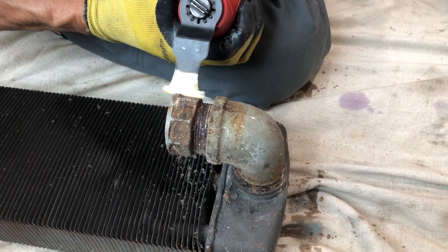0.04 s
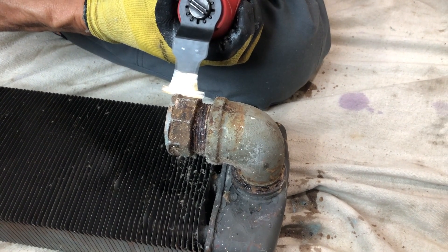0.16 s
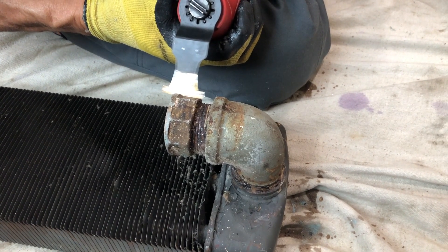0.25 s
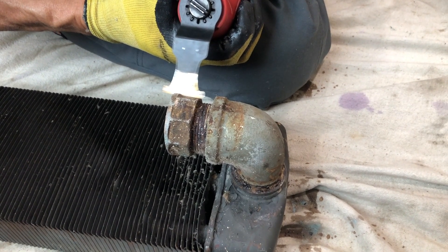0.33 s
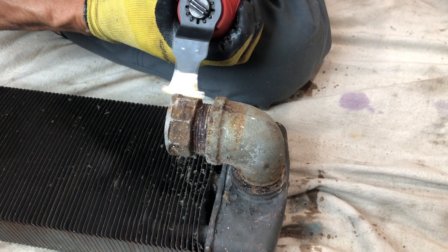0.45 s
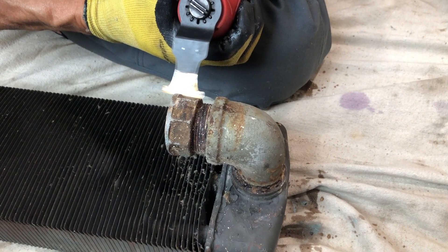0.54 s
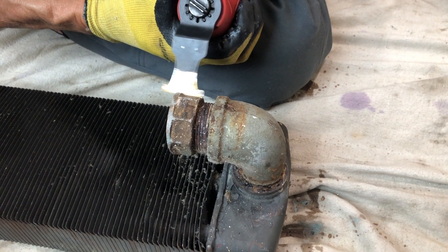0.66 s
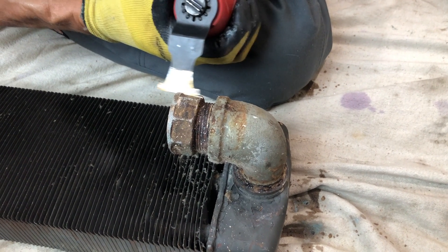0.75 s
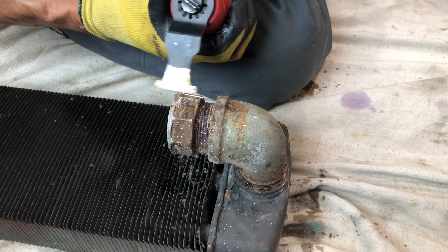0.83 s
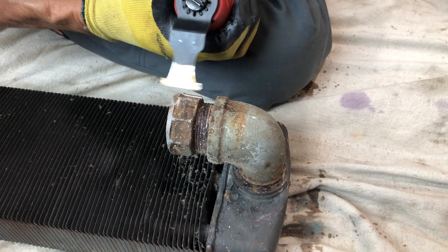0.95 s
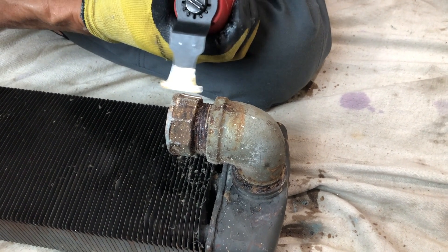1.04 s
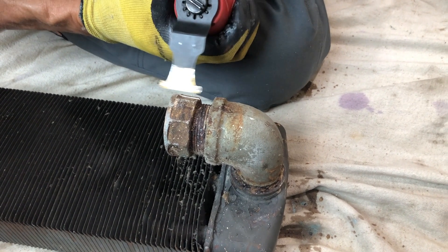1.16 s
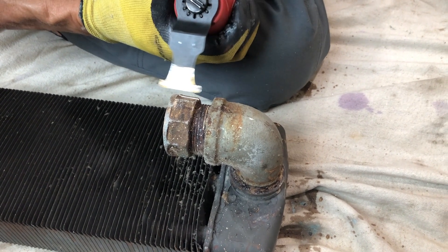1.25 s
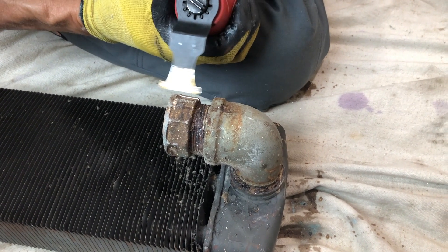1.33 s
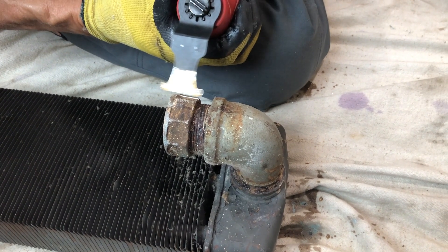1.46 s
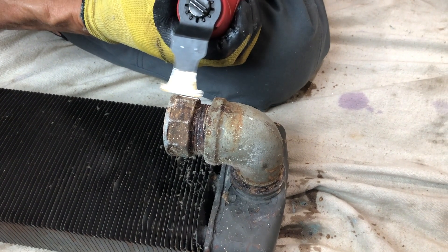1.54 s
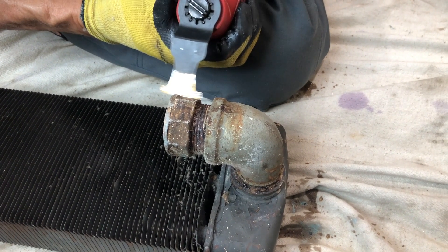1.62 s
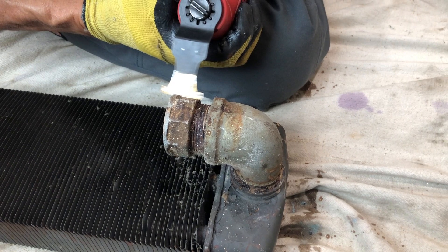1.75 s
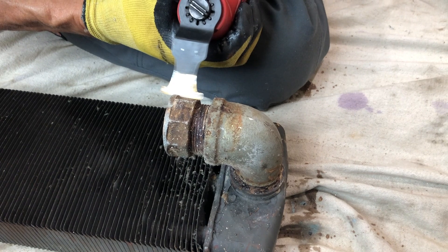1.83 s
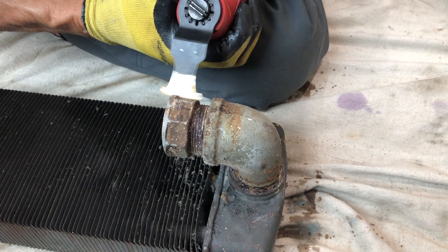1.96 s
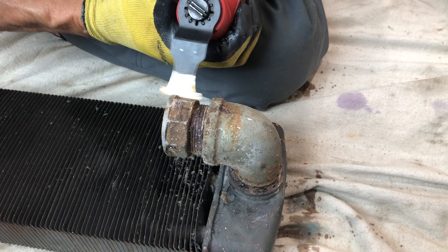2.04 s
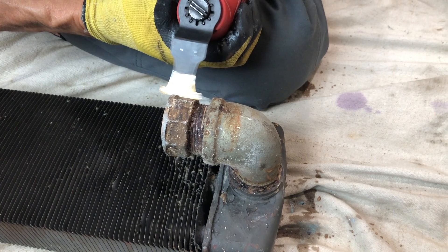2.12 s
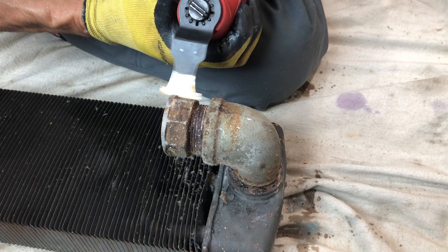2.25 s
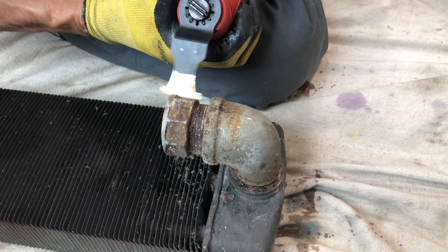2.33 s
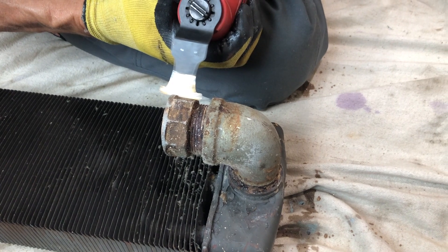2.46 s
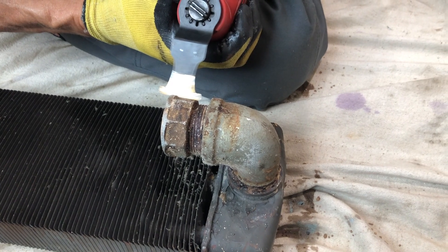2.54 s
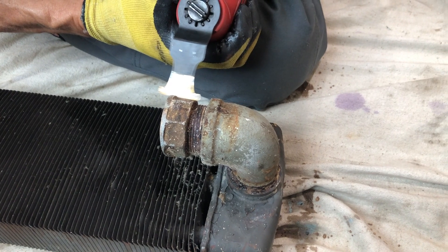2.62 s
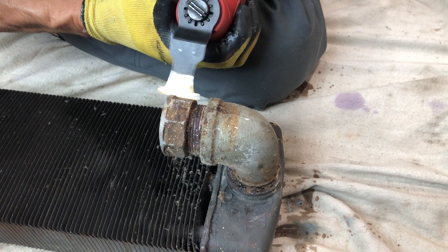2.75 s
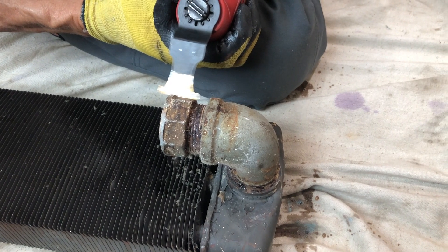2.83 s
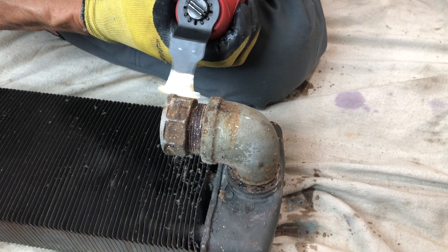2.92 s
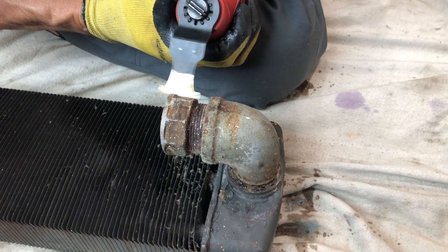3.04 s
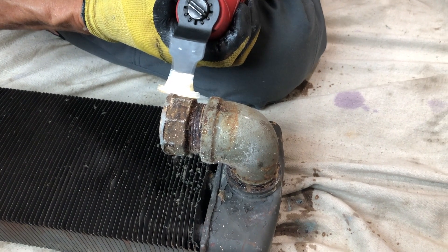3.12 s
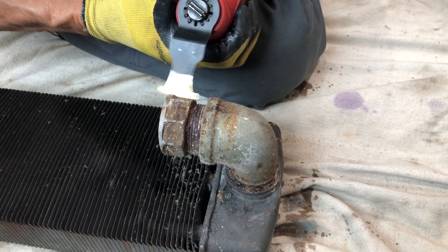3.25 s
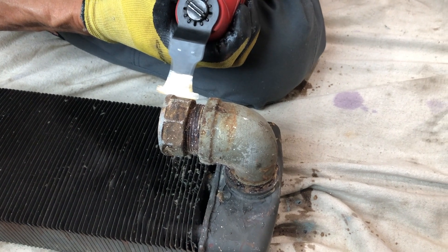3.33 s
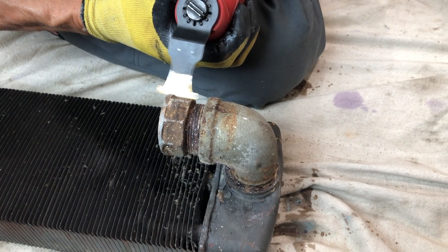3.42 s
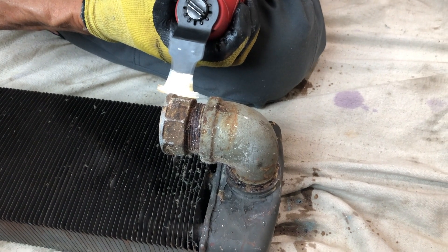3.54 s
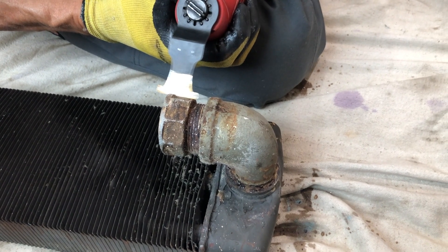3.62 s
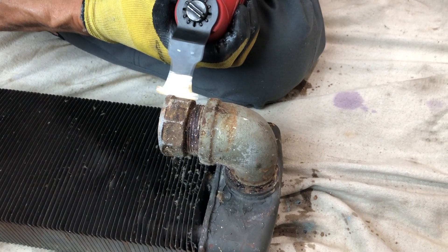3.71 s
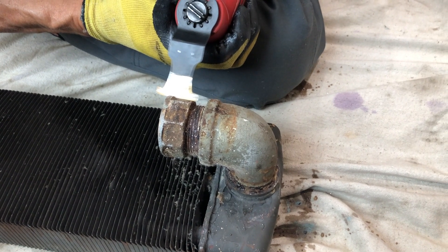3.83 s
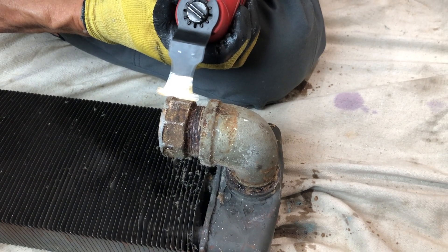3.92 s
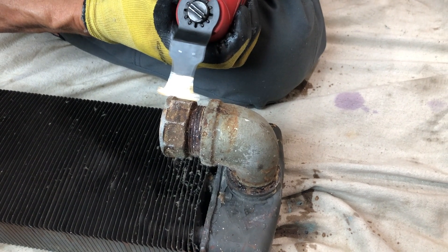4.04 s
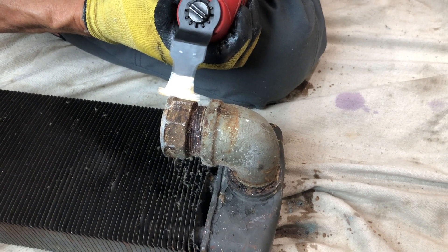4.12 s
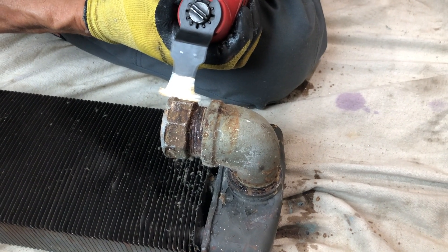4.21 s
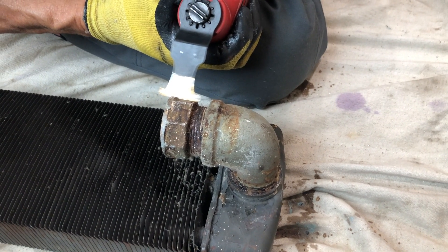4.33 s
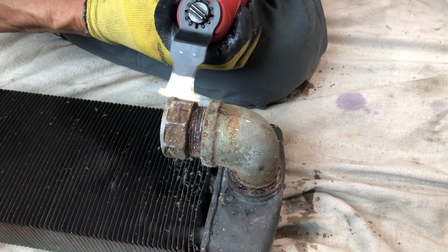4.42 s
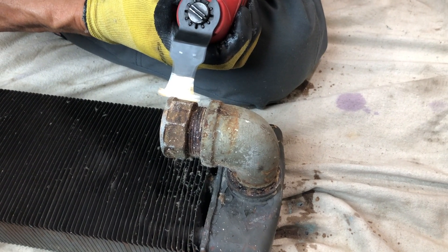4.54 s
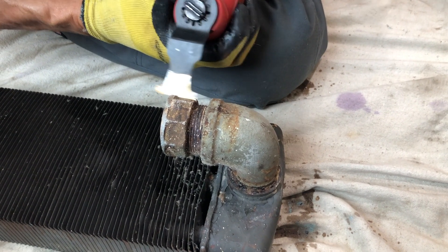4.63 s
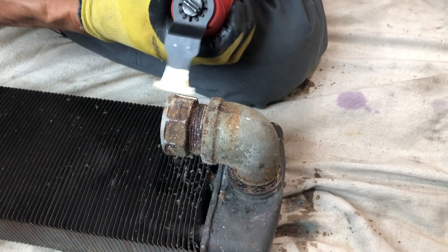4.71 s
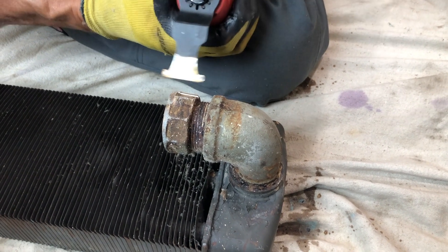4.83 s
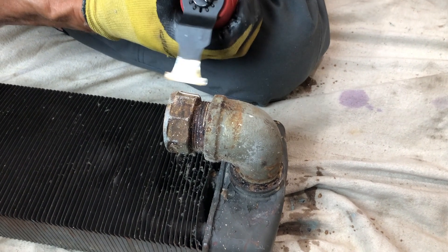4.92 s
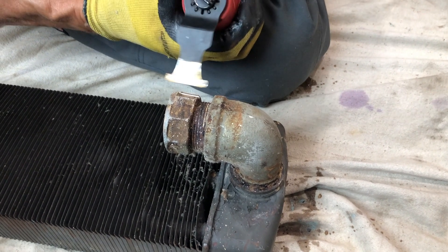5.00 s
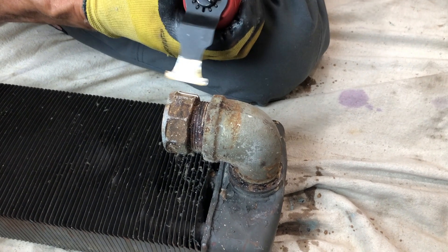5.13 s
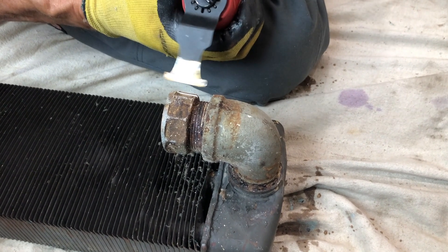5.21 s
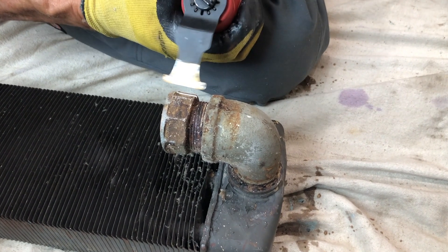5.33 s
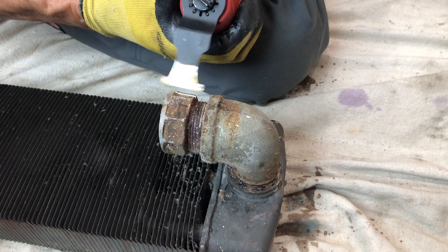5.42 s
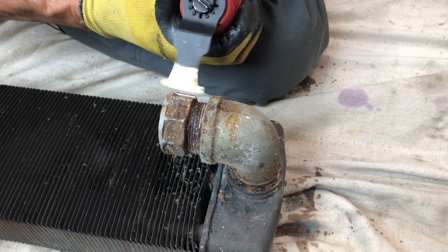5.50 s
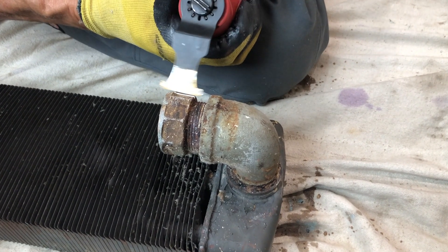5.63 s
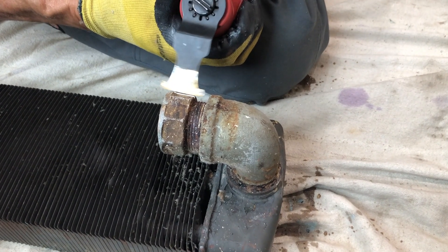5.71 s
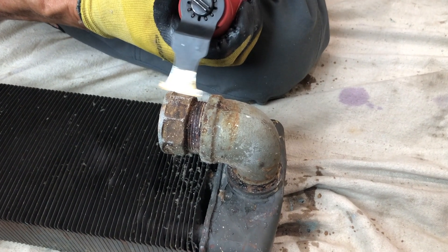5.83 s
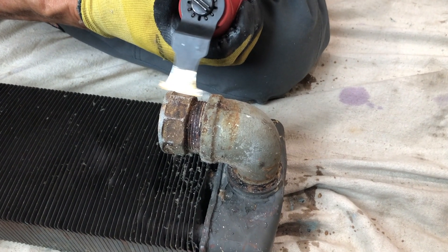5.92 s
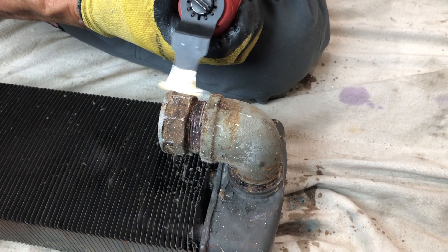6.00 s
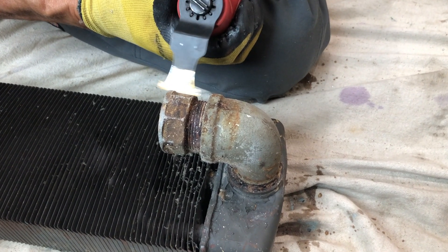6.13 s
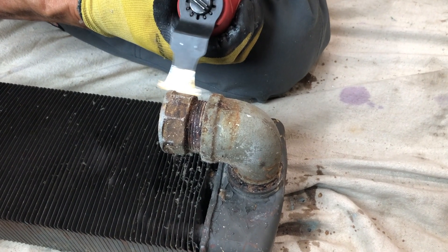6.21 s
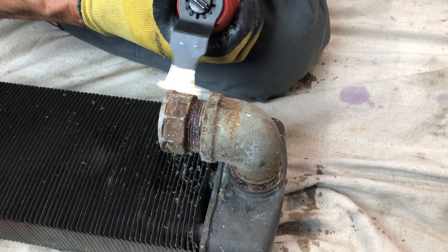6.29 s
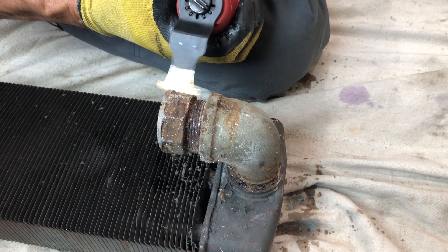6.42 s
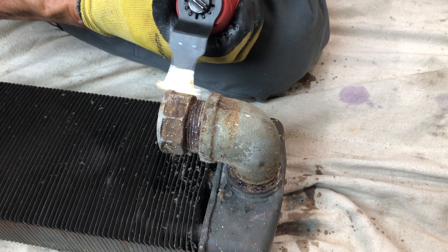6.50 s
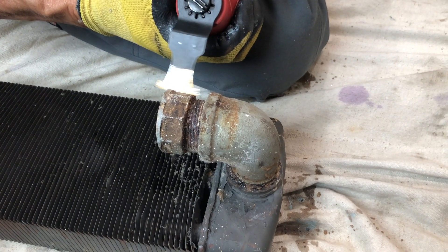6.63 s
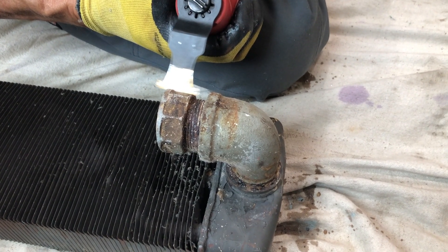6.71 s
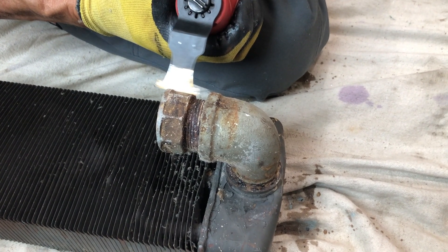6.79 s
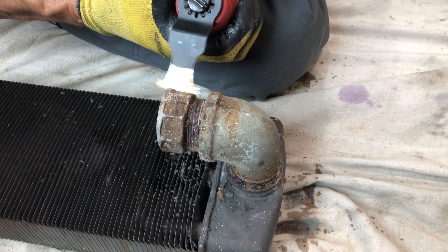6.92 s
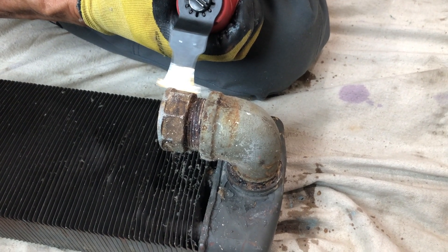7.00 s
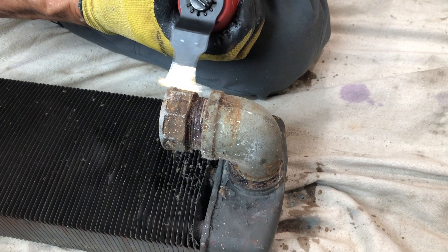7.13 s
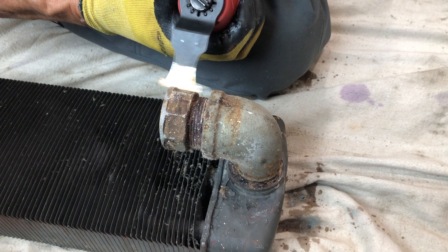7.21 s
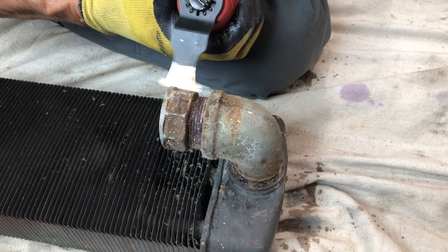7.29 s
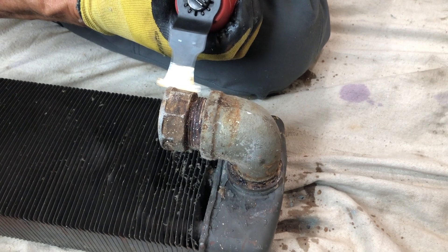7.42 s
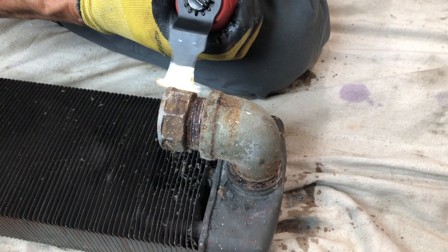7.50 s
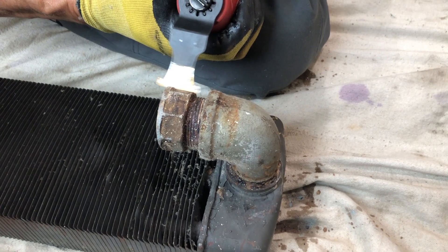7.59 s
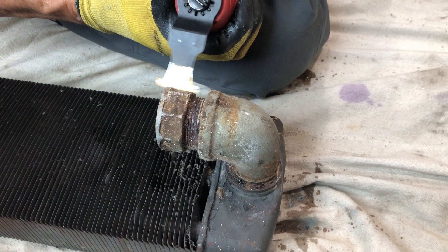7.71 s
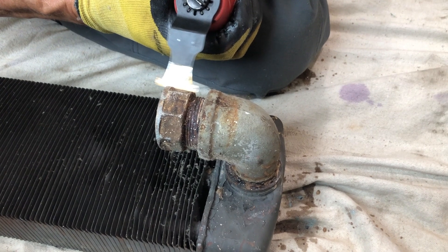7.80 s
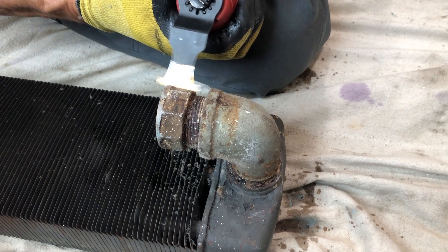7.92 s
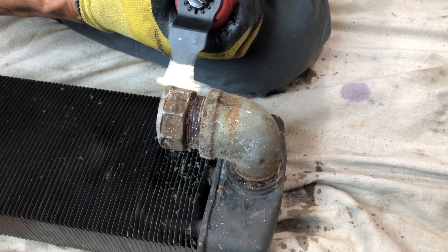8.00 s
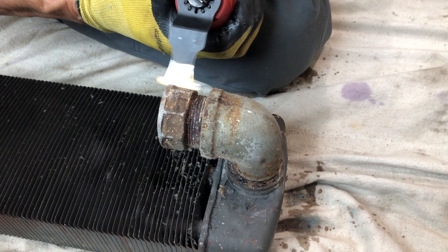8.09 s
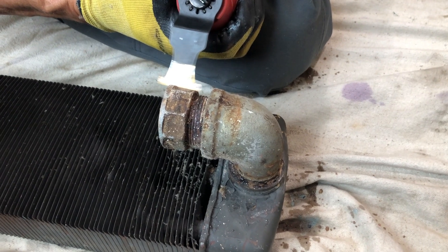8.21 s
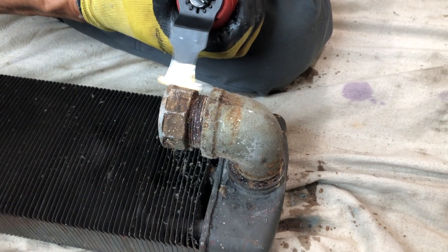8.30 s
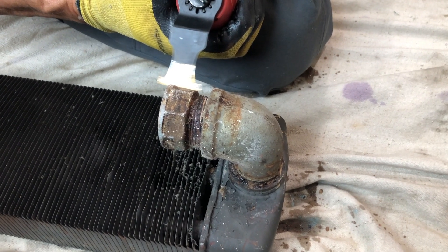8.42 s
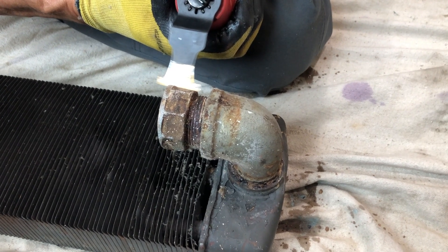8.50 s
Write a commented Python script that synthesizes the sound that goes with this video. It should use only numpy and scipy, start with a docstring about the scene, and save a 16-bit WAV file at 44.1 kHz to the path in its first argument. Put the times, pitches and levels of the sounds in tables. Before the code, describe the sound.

An oscillating power tool is already cutting a rusty steel pipe fitting at the start, close and dry in a quiet indoor space. The rasp is loud, bright and gritty, ringing through blade and pipe, with a fast steady buzz around 230 strokes per second. At about 0.65 s the blade lifts; light scratches fade into a much quieter motor buzz with fan hiss, its speed briefly rising. At 1.6 s it bites again and grinds until about 4.6 s, wavering with hand pressure, slipping and catching, while the loose work throbs and rattles. Two soft dull pops come close together near 3.75 s. From 4.7 to 5.6 s the tool runs free again, faintly buzzing. Brief touches lead into the last cut at 5.8 s, harsh and uneven with heavier jolts and low grinding, continuing to the end at about 8.6 s.

```python
"""Harsh steel rasping is heard first: an oscillating saw blade cuts a rusty fitting, lifts twice and returns.
Each stroke excites the resonances of blade and pipe with noise, and multiples of the swing rate add the blows.
The tool is a harmonic buzz over fan noise; the loose work throbs, grinds and rattles, and jolts kick it.
Two dull pops are swings of falling pitch, and a faint room rumble lies beneath."""
import sys
import numpy as np
from scipy import signal
from scipy.fft import rfft, irfft
from scipy.io import wavfile
from scipy.ndimage import uniform_filter1d

SR = 44100
rng = np.random.default_rng(int(sys.argv[2]) if len(sys.argv) > 2 else 0)


def unload_wav(signal):
    """Save mono or channel-first audio to the path in sys.argv[1] as 16-bit WAV at rate SR, clipped to [-1, 1]."""
    wavfile.write(
        sys.argv[1],
        SR,
        np.round(np.clip(np.atleast_2d(signal).T, -1, 1) * 32767).astype(np.int16),
    )


N = 377055

# Blade in the cut: full contact start_s, end_s
CUTS = [(-.1, 0.648), (1.632, 4.57), (5.79, 8.7)]
ENTER_S, LEAVE_S, LINGER_S = 0.017, 0.1, 0.2   # the throb outlasts the contact by LINGER_S
# Pressure of the hand: start_s, rasp_db, clang_db (re rasp)
FEED = [(0, -22.5, -11.5), (.14, -21.5, -10.5), (.33, -21, -7), (.45, -21.5, -9), (.64, -24.5, -8.5),
        (1.64, -23.5, -8.5), (1.72, -26, -7.5), (1.8, -19.5, -6.5), (1.9, -21, -11), (2.02, -22.5, -7),
        (2.2, -21, -8.5), (2.45, -22.5, -7.5), (2.9, -21.5, -11), (3.05, -24.5, -9.5), (3.21, -20.5, -8),
        (3.5, -23.5, -9.5), (3.85, -24.5, -9), (4.2, -23.5, -10), (4.55, -23.5, -9.5), (5.8, -25, -9.5),
        (5.97, -23, -11), (6.14, -22, -6), (6.4, -21.5, -8.5), (6.78, -21.5, -11.5), (7.05, -21.5, -9.5),
        (7.3, -23, -10), (7.45, -20.5, -10), (7.9, -21.5, -8), (8.24, -21, -10), (8.55, -24.5, -5.5)]
FEED_WAVER_DB, CLANG_WAVER_DB = 0.5, 1
# Teeth lose hold, then bite harder: start_s, rasp_loss_db (a negative loss reverses both)
SLIPS = [(.24, 1.5), (.385, 7), (.6, 3), (2.28, 6.5), (2.33, 4), (2.38, 2), (2.52, 4.5), (2.928, 7),
         (3.64, 1), (4.5, 2.5), (6.11, -1), (6.25, 3.5), (6.29, 3.5), (6.97, 3), (7.29, 3.5), (7.379, 0),
         (7.61, 4), (7.85, 1), (7.935, 4), (6.81, 2), (7.26, 1.5), (7.999, 6), (8.341, 6), (8.41, 3)]
SLIP_S, REBITE_S, REBITE_SHARE, CLANG_SLIP_SHARE = 0.025, 0.12, 0.17, 1.14
# Glancing touches near the work: start_s, length_s, rasp_db, clang_db
BRUSHES = [(0.683, 0.0072, -35, -39), (.71, 0.11, -41.5, -46), (.822, .012, -42, -42),
           (1.567, 0.057, -37.5, -37.5), (4.609, 0.029, -31, -38.5), (4.684, 0.0067, -38, -36),
           (4.716, 0.0085, -59, -53), (5.642, 0.028, -35, -35), (5.722, 0.032, -32, -35)]
BRUSH_RISE_S, BRUSH_FALL_S = 0.009, 0.011
# Seat of the blade in the kerf: start_s, favoured_pitch_hz (pipe), blows_db (re pipe rasp),
# whine_db (re low blade rasp), middle_modes_db
SEAT = [(0, 4100, 4, 2, -2), (.16, 3540, -8, -14, 2), (.3, 3260, -26, -7, -1.5), (.45, 3460, 4, -9, -1),
        (.62, 3880, -8, 0, 0), (1.65, 3600, -18, -21, 2), (1.92, 4080, 4, -4, 1), (2.15, 3770, -6, -15, -1),
        (2.6, 3400, -6, -21, -0.5), (2.85, 3320, 0.5, -4, -2), (3.05, 3370, -4.5, -8.5, -2.5),
        (3.3, 3500, -5, -19, 0.5), (3.55, 3330, 3, 3, -0.5), (3.8, 3340, -2.5, -9, -1.5),
        (4.05, 3370, 5, 8, -0.5), (4.22, 3300, -3, -12, -1), (4.55, 3500, 1.5, 5, -3),
        (5.75, 3700, -22, -36, -1.5), (5.95, 3750, 1, 0, 3), (6.14, 3400, -11, -22, -1),
        (6.4, 3200, -13, -18, -1.5), (6.7, 3200, -6, 0, -.5), (6.95, 3430, -7, -20, 0),
        (7.2, 3700, -6, -5, 0), (7.5, 3270, -11, -12, -1), (7.75, 3280, -12, -19, 0),
        (8.05, 3300, -8, -9, -4), (8.24, 3400, -1.5, -16, 0), (8.4, 3360, -8, -6, 0),
        (8.55, 3500, -13, -9, 1)]
# Level of the low blade modes: start_s, level_db
LOW_RING = [(0, -5), (.15, -1.5), (.42, -5), (.62, 0), (.85, -3), (1.6, -1.5), (1.95, -3.5), (2.3, -5),
            (2.55, -4), (2.85, -4.5), (3.3, -4), (4.55, -2.5), (5.7, -1), (6, -5), (6.3, -2.5), (6.9, -4),
            (7.2, -1), (7.65, -4.5), (8, -3.5), (8.55, -2.5)]
LOW_WAVER_DB = 1.2
# Blade modes, low to high: pitch_hz, width_hz (one filter pass), level_db
BLADE = [(5370, 130, -8), (5770, 110, -11), (6230, 150, -10), (6690, 150, -8), (6920, 110, -7),
         (7150, 100, -2), (7290, 190, 0), (8950, 450, -9), (9860, 200, -3), (10250, 350, -4),
         (10850, 220, -3), (11080, 280, -1), (11380, 280, -4), (12200, 250, -9), (12800, 300, -7),
         (13330, 500, -2), (14530, 300, -2), (15080, 420, -3), (15600, 260, -6)]
# Rasp between the modes: pitch_hz, density_db (per Hz)
RASP_BED = [(1900, -32), (2400, -20), (4500, -19.5), (6000, -8), (7600, -5), (11000, -3.5), (15800, -2.5)]
RASP_BED_DB = 1.75   # while the middle blade modes stand at 0 dB
# Pipe modes: pitch_hz, width_hz (one filter pass), level_db
PIPE = [(2340, 84, -6), (2591, 60, 2), (2713, 138, -1), (2857, 330, -8), (3214, 113, 1.5), (3399, 110, 0.5),
        (3490, 100, -6.5), (3638, 58, 4), (3894, 204, 0), (4160, 80, 2), (4310, 69, -7), (4353, 156, -1.5),
        (4604, 180, -4.5), (4810, 74, -8), (5120, 60, -0.5)]
# Regular blows of the swing: multiple (of the swing rate), level_db
HAMMER_ORDERS = [(1, -8), (2, -18), (3, -13), (4, -12), (5, -26.5), (6, -22), (7, -13), (8, -9), (9, -17),
                 (10, -8.5), (11, 0.5), (12, -6), (13, -2), (14, -4.5), (15, -1.5), (16, 0), (17, -18),
                 (18, 1), (19, -20), (20, -15), (21, -7), (22, -28), (23, -3.5), (24, -2.5), (25, -25),
                 (26, -2), (27, -18), (28, -8), (29, -10), (30, 3), (31, 0.5), (32, 5), (33, -16), (34, -6)]
# Blade swing, overshooting as the load comes off and sagging as it returns: start_s, swing_rate_hz
SWING = [(0, 231.5), (.3, 231.5), (.72, 233.4), (.95, 232.1), (1.25, 231.1), (1.65, 231), (1.8, 230),
         (2.4, 230.5), (3.2, 230.9), (3.45, 230), (3.6, 230), (3.78, 230.6), (4.65, 230.7), (4.7, 233.4),
         (4.8, 233.2), (5, 231.4), (5.4, 230.7), (6.05, 230), (6.75, 230.7), (7.8, 230.8), (7.95, 229.8),
         (8.1, 229.8), (8.25, 230.7), (8.55, 230.6)]
# Free-running tool: start_s, level_db, fan_and_bearings_db (re buzz)
TOOL = [(0, -28, -14), (.8, -43.5, 1.5), (1.1, -42, -4.5), (1.55, -40, -3.5), (2, -42, -12.5),
        (4.6, -42, -4), (4.72, -45.5, 0.5), (4.85, -44, -5), (5, -45, -4), (5.3, -42, -6.5),
        (5.6, -40, -3.5), (6, -33.5, -14), (8.55, -29.5, -12)]
# Tool buzz in the first grip: multiple (of the swing rate), level_db
TOOL_ORDERS = [(1, -10), (2, 0.5), (3, -6.5), (4, -7), (5, 4.5), (6, -1), (7, 2.5), (8, 0), (9, -1),
               (10, -14), (11, 0.5), (12, -6), (13, 0), (14, -5.5), (15, 4), (16, -2), (17, 0), (18, -6),
               (19, 2), (20, 3), (21, -6), (22, -16), (23, -21), (24, -11), (25, -2.5), (26, -20), (27, -4),
               (28, -14), (29, -16), (30, -8), (31, -12), (32, -22), (33, -7), (34, -27), (35, -15),
               (36, -19), (37, -13), (38, -29), (39, -14), (40, -19), (41, -12), (42, -8), (43, -15),
               (44, -20), (45, -17), (46, -18), (47, -20), (48, -25), (49, -14), (50, -7), (51, -12),
               (52, -22), (53, -22), (54, -23), (55, -20), (56, -9), (57, -15), (58, -20), (59, -21),
               (60, -22)]
# Tool buzz after the hand has shifted: multiple (of the swing rate), level_db
REGRIP_ORDERS = [(1, -11), (2, -2.5), (3, -2), (4, -13), (5, 5.5), (6, -2), (7, 0), (8, 2), (9, -5),
                 (10, -4), (11, -4.5), (12, -8), (13, 3), (14, 2.5), (15, 4.5), (16, -11), (17, -5),
                 (18, -0.5), (19, -5), (20, -6), (21, 1), (22, -2), (23, -4), (24, -3), (25, 0), (26, -40),
                 (27, -4), (28, -16), (29, -5), (30, -1.5), (31, -26), (32, -4), (33, -10), (34, -25),
                 (35, -30), (36, -6), (37, -9), (38, -17), (39, -22), (40, -15), (41, -27), (42, -15),
                 (43, -9), (44, -6), (45, -8), (46, -17), (47, -17), (48, -21), (49, -7), (50, -14),
                 (51, -8), (52, -7), (53, -27), (54, -26), (55, -18), (56, -20), (57, -6), (58, -6),
                 (59, -19), (60, -19)]
REGRIP_S = 3.2
# Fan and bearings: pitch_hz, density_db (per Hz)
TOOL_AIR = [(40, -33), (200, -32), (420, -13), (600, -3.5), (1200, -2.5), (1900, -1.5), (3200, 0.5),
            (5000, 0), (9000, -10), (10500, -3), (12300, -16), (13200, 1), (14000, -9), (15200, -5),
            (15800, -6)]
# Shaking of the work: start_s, throb_db (at the swing rate), grind_db, rattle_db
SHAKE = [(0, -60, -54, -68), (.12, -47, -42, -73), (.3, -48, -32.5, -69), (.47, -40.5, -34.5, -55),
         (.57, -43.5, -45, -69), (1.64, -48.5, -37.5, -62), (1.98, -42, -40.5, -61),
         (2.2, -44.5, -36.5, -50), (2.57, -41, -36, -44.5), (2.9, -46.5, -43.5, -59),
         (3.02, -44, -40.5, -54), (3.09, -45.5, -43, -61), (3.3, -41, -34.5, -44), (3.47, -46, -43.5, -78),
         (3.9, -49.5, -43.5, -71), (4.12, -47, -51, -66), (4.28, -44.5, -47, -45), (4.4, -45, -40, -77),
         (4.52, -48, -51, -83), (5.9, -56, -40, -70), (6.1, -40, -33, -52), (6.5, -45.5, -32, -47),
         (6.72, -45.5, -34, -50), (6.77, -48, -55, -46), (6.85, -47, -33, -55), (7.07, -45.5, -38, -68),
         (7.33, -47, -45, -81), (7.45, -41, -31.5, -64), (7.74, -46.5, -33.5, -57), (8.17, -47, -34, -65),
         (8.31, -62, -36.5, -58), (8.55, -39.5, -26, -55)]
FLEX_DB, FREE_THROB_DB = -18.5, -17.5   # blade flex re grind; throb in the air re tool level
# Grinding noise of the work: pitch_hz, density_db (per Hz)
GRIND = [(330, -5.5), (420, -9), (550, -4.5), (900, -2), (1300, -8), (1750, 5), (2000, -5), (2300, -1)]
# Resonances in the grind: pitch_hz, width_hz (one filter pass), level_db
GRIND_RING = [(1073, 250, -5.5), (1521, 35, -7), (1728, 29, 2)]
# Blade bending as it bounces: pitch_hz, width_hz (one filter pass), level_db
FLEX = [(250.6, 39, 5.5), (316, 51, 1.5), (293, 63, -4)]
# Rattle of the loose work: pitch_hz, width_hz (one filter pass), level_db
RATTLE = [(66, 20, -37), (97, 15, -9.5), (131.4, 18.7, -0.5)]
# Low tones always in the cut: multiple (of the swing rate), level_db
LOW_TONES = [(2, -55.5), (3, -49.5), (4, -51), (5, -73.5), (6, -56.5), (7, -52), (8, -51.5), (9, -56.5)]
# One multiple sings out for a while: start_s, length_s, multiple (of the swing rate), level_db
SPELLS = [(0, 0.066, 5, -45), (0, 0.056, 8, -48), (0.14, 0.071, 3, -42), (0.164, 0.15, 2, -56),
          (.24, 0.1, 4, -42), (0.25, 0.31, 5, -41.5), (.26, 0.33, 7, -54), (0.257, 0.29, 6, -53),
          (0.425, 0.15, 3, -44.5), (1.664, .95, 2, -51.5), (1.666, 0.33, 4, -48), (1.66, 0.92, 5, -44.5),
          (1.813, 0.16, 6, -49), (1.814, 0.12, 7, -52), (2.103, 0.66, 6, -59), (2.45, 1.1, 8, -54.5),
          (2.497, 0.14, 4, -62), (3.248, 0.13, 6, -51), (3.25, .15, 4, -56), (3.837, 0.71, 8, -49),
          (4.16, 0.6, 3, -57), (4.218, 0.38, 4, -57), (5.813, .4, 5, -45), (5.862, 0.34, 2, -59),
          (5.885, .1, 8, -60), (6.05, 0.18, 4, -45), (6.08, 0.16, 7, -51), (6.077, .12, 3, -55),
          (6.5, 0.28, 4, -53), (6.492, 0.5, 3, -53), (6.52, 0.1, 8, -48), (6.52, 0.24, 7, -60),
          (7.057, 0.34, 5, -46), (7.287, 0.14, 4, -49), (7.326, 0.25, 7, -44.5), (7.398, 0.14, 5, -42.5),
          (7.412, 0.51, 3, -49.5), (7.45, 1, 2, -57), (7.62, .12, 8, -52), (7.62, 0.24, 4, -53),
          (7.727, 0.16, 6, -47), (7.806, .8, 7, -41.5), (7.972, 0.18, 4, -40), (7.954, 0.13, 5, -39.5),
          (7.976, 0.16, 8, -46), (8.343, 0.12, 5, -41.5), (8.343, .14, 3, -51), (8.37, 0.16, 4, -43),
          (8.33, .25, 8, -56), (0, 0.086, 3, -51), (0.624, 0.15, 4, -48), (.66, 0.11, 3, -48),
          (.88, .2, 13, -51.5), (0.902, 0.8, 15, -58), (1.196, 0.37, 3, -52), (2.75, 0.25, 12, -47),
          (3.4, 0.28, 15, -54), (3.8, .35, 15, -55), (4.297, 0.37, 15, -52), (4.675, 0.22, 4, -58.5),
          (4.743, 0.24, 13, -51), (4.736, .2, 15, -59), (.88, .14, 30, -56), (4.74, .18, 19, -58),
          (4.764, .16, 24, -57), (5.25, 0.55, 5, -47.5), (5.822, 0.11, 19, -40), (5.842, 0.11, 18, -39.5)]
SPELL_EDGE_S, SILENT_DB = 0.055, -120
# Jolts to blade and work: start_s, flex_db, grind_db, rattle_db (all before the rise is smoothed)
JOLTS = [(.165, -47.5, -35, -59), (.26, -50, -30, -60), (.33, -55, -43, -68), (.41, -46, -33, -57),
         (0.621, -37, -29, -57), (0.828, -41, -30.5, -51), (1.57, -52, -32, -80), (1.64, -40, -31, -55),
         (1.83, -59, -36, -41), (2.14, -64, -45, -45), (2.45, -53, -55, -59), (2.96, -66, -41, -61),
         (3.24, -47, -40, -58), (3.76, -48, -38, -42), (4.19, -59, -30, -57), (4.62, -37, -27, -56),
         (4.68, -43, -36.5, -70), (4.72, -43, -46, -59), (5.67, -41, -27.5, -70), (5.73, -36.5, -28.5, -65),
         (6.31, -56, -40, -51), (6.41, -39, -31, -51), (6.48, -62, -38, -52), (7.07, -51, -44, -66),
         (7.4, -49, -28.5, -65), (7.62, -38, -40, -43), (7.88, -44, -27, -64), (8.04, -39, -27, -46),
         (8.38, -39, -26, -60), (8.52, -48, -42, -53)]
JOLT_RISE_S = 0.02
# Time of each jolt to fall by 60 dB: flex_s, grind_s, rattle_s
JOLT_T60_S = (0.32, 0.16, .2)
# Dull pops of falling pitch: start_s, level_db (before make-up and decay), start_pitch_hz, end_pitch_hz
POPS = [(3.7365, -20.5, 1330, 60), (3.763, -21.5, 1290, 60)]
# Room rumble: pitch_hz, density_db (per Hz)
ROOM_RUMBLE = [(20, 0), (60, 6), (120, -11)]
ROOM_RUMBLE_DB = -76
CUTOFF_HZ = 15790


def amp(db):
    """Decibel law: 20 dB are a factor of ten in amplitude."""
    return 10 ** (np.asarray(db) / 20)


def rms_one(x):
    """Normalisation to unit mean power."""
    return x / np.sqrt(np.mean(x ** 2) + 1e-20)


def in_time(rows):
    """Linear interpolation of table columns to sample-rate curves."""
    s, *columns = np.transpose(rows)
    return [np.interp(np.arange(N) / SR, s, column) for column in columns]


def ramp(start, end, rise, fall):
    """Trapezoidal envelope: linear from 0 to 1 and back, full from start to end."""
    out = np.zeros(N)
    span = np.arange(*np.clip([int((start - rise) * SR), int((end + fall) * SR)], 0, N))
    out[span] = np.interp(span / SR, [start - rise, start, end, end + fall], [0, 1, 1, 0])
    return out


def drift(rate):
    """Random modulation: noise low-passed near rate in Hz, with unit rms, computed every 40 samples."""
    r = np.exp(-80 * np.pi * rate / SR)
    noise = rng.standard_normal(N // 40 + 2002)
    slow = signal.lfilter([1], [1, -2 * r, r * r], noise)[2000:]   # settled part only
    return np.interp(np.arange(N) / 40, np.arange(len(slow)), rms_one(slow))


def colour(push, spectrum):
    """Spectral shaping: noise of strength push weighted by a spectrum, fainter outside it; unit rms."""
    hz = np.arange(1, N // 2 + 2) * SR / N
    at_hz, db = np.transpose(spectrum)
    gain = amp(np.interp(np.log(hz), np.log(at_hz), db, left=db[0] - 17, right=db[-1] - 4.5))
    return rms_one(irfft(rfft(push * rng.standard_normal(N)) * gain, N))


def resonate(push, modes, waver_db, waver_rate):
    """Modal resonance: noise of strength push drives parallel modes of wavering coupling; unit rms."""
    out = 0
    noises = push * rng.standard_normal((3, N))   # neighbouring modes get unrelated noise
    for k, (hz, width, level_db) in enumerate(modes):
        r = np.exp(-np.pi * width / SR)
        b = [(1 - r * r) / 2, 0, -(1 - r * r) / 2]
        a = [1, -2 * r * np.cos(2 * np.pi * hz / SR), r * r]
        once = signal.lfilter(b, a, noises[k % 3])
        mode = signal.lfilter(b, a, once)   # second pass: steep flanks, dark valleys
        out = out + amp(level_db + waver_db * drift(waver_rate)) * mode
    return rms_one(out)


def buzz(turns, orders, waver_db, waver_rate, wobble, favour_db=lambda k: 0):
    """Harmonic synthesis: multiples of the swing rate waver in level and phase (wobble in turns); rms near 1."""
    tones, power = 0, 0
    for k, level_db in orders:
        gain = amp(level_db + favour_db(k)) * np.ones(N)
        phase = k * turns + rng.random() + wobble * drift(waver_rate)
        tones = tones + gain * amp(waver_db * drift(waver_rate)) * np.sin(2 * np.pi * phase)
        power = power + gain ** 2 / 2
    return tones / np.sqrt(power)


def strokes(turns, forward, both, uneven_db):
    """Periodic forcing: force swells at mid-stroke, one way biting harder, with a random grip per stroke."""
    stroke = (2 * turns).astype(int)
    grip = amp(uneven_db * rng.standard_normal(stroke[-1] + 1))[stroke]
    return grip * np.exp(forward * np.cos(2 * np.pi * turns - np.pi / 2) - both * np.cos(4 * np.pi * turns))


def blade_rasp(turns, teeth, middle_db, whine_db):
    """Forced resonance of a plate: tooth noise and a harmonic whine sound the blade modes."""
    low_db = in_time(LOW_RING)[0] + LOW_WAVER_DB * drift(3.8)
    whine = amp(whine_db) * buzz(turns, HAMMER_ORDERS[21:], 1.9, 30, 0.047)
    low = whine + resonate(teeth, BLADE[:7], 2.4, 8.1)
    low = low / np.sqrt(1 + amp(2 * whine_db))   # whine and rasp share one power
    middle = resonate(teeth, BLADE[7:13], 0.95, 4.9)
    high = resonate(teeth, BLADE[13:], 0.98, 1.3)
    modes = amp(low_db) * low + amp(middle_db) * middle + amp(-3.0) * high
    bed = amp(RASP_BED_DB - 0.5 * middle_db) * colour(teeth, RASP_BED)   # a ringing blade hisses less
    return rms_one(modes + bed)


def pipe_clang(turns, teeth, favoured_hz, blows_db):
    """Forced resonance of a pipe: tooth noise drives its modes, and regular blows add harmonics."""
    def near_db(k):
        """Resonant emphasis: multiples near the favoured pitch ring louder (231 Hz nominal swing rate)."""
        return 6 * np.exp(-((k * 231 - favoured_hz) / 350) ** 2)

    blows = amp(blows_db) * buzz(turns, HAMMER_ORDERS[9:21], 3.1, 7.5, 0.04, near_db)
    rasp = resonate(teeth ** 1.2, PIPE, 1.9, 4.8)
    return (blows + rasp) / np.sqrt(1 + amp(2 * blows_db))   # blows and rasp share one power


def cut(turns, rasp_gain, clang_gain):
    """Stick and release at the teeth: one uneven stroke force excites both blade and pipe."""
    favoured_hz, blows_db, whine_db, middle_db = in_time(SEAT)
    teeth = strokes(turns, .36, .42, 2.4) * amp(0.33 * drift(52))
    rasp = blade_rasp(turns, teeth, middle_db, whine_db)
    clang = pipe_clang(turns, teeth, favoured_hz, blows_db)
    return rasp_gain * rasp + clang_gain * clang


def in_cut():
    """Contact envelope: 1 while the blade bears fully on the work, with squared ramps around it."""
    return sum(ramp(start, end, ENTER_S, LEAVE_S) ** 2 for start, end in CUTS)


def contact():
    """Contact force sets excitation: gains of rasp and clang from hand pressure, slips and touches."""
    slip_db = 0
    for s, loss_db in SLIPS:
        dip = ramp(s, s, SLIP_S, SLIP_S / 2)
        rebite = REBITE_SHARE * ramp(s + SLIP_S, s + SLIP_S, SLIP_S / 2, REBITE_S)
        slip_db = slip_db + loss_db * (rebite - dip)
    feed_db, pipe_db = in_time(FEED)
    feed_db = feed_db + FEED_WAVER_DB * drift(22)
    clang_db = feed_db + pipe_db + CLANG_SLIP_SHARE * slip_db + CLANG_WAVER_DB * drift(21)
    rasp = in_cut() * amp(feed_db + slip_db)
    clang = in_cut() * amp(clang_db)
    for s, length, rasp_db, brush_clang_db in BRUSHES:
        glance = ramp(s, s + length, BRUSH_RISE_S, BRUSH_FALL_S) ** 2
        rasp = rasp + amp(rasp_db) * glance
        clang = clang + amp(brush_clang_db) * glance
    return rasp, clang


def tool(turns, touching):
    """Periodic drive: an eccentric radiates harmonics over the stroke-modulated rush of fan and bearings."""
    air = colour(strokes(turns, 0.21, 0.26, 0.75), TOOL_AIR)
    shifted = np.arange(N) > REGRIP_S * SR
    first, later = dict(TOOL_ORDERS), dict(REGRIP_ORDERS)
    # the swing rate itself is left to the throb of the work
    drive = buzz(turns, TOOL_ORDERS[1:], 1.5, 2.2, .02, lambda k: shifted * (later[k] - first[k]))
    drive = drive * (1 - .75 * touching)   # the work damps the free buzz
    level_db, air_db = in_time(TOOL)
    return amp(level_db) * (drive + amp(air_db) * air)


def work(turns, touching):
    """Forced vibration of a loose body: throb at the swing rate, grind, flex and rattle, kicked by jolts."""
    throb_db, grind_db, rattle_db = in_time(SHAKE)
    flex_kick, grind_kick, rattle_kick = jolts()
    bearing = in_cut()
    throb = np.sqrt(2) * np.sin(2 * np.pi * turns) * amp(1.4 * drift(62))
    push = strokes(turns, 0.17, 0.47, 1.26) * amp(3.0 * drift(34))
    grind = colour(push, GRIND) + amp(-11.0) * resonate(push, GRIND_RING, 1.2, 0.83)
    flex = resonate(amp(2.2 * drift(32)), FLEX, 2.5, 5.3)
    rattle = resonate(1, RATTLE, 0.68, 9.8)
    lingering = sum(ramp(start, end, ENTER_S, LINGER_S) ** 2 for start, end in CUTS)
    shaking = np.maximum(touching, lingering) * amp(throb_db + 0.97 * drift(9.0))
    shaking = shaking + amp(in_time(TOOL)[0] + FREE_THROB_DB)
    grind_gain = bearing * amp(grind_db) + grind_kick
    flex_gain = bearing * amp(grind_db + FLEX_DB) + flex_kick
    rattle_gain = bearing * amp(rattle_db + 1.1 * drift(11.0)) + rattle_kick
    return (shaking * throb + low_tones(turns, bearing)
            + grind_gain * grind + flex_gain * flex + rattle_gain * rattle)


def low_tones(turns, bearing):
    """Harmonic response: low multiples hum in the cut, and a multiple swells during its spells."""
    out = 0
    steady_db = dict(LOW_TONES)
    spelled = np.round(np.array(SPELLS)[:, 2])
    for k in np.union1d(spelled, np.array(LOW_TONES)[:, 0]):
        gain = bearing * amp(steady_db.get(k, SILENT_DB))
        for (s, length, _, level_db), multiple in zip(SPELLS, spelled):
            if multiple == k:
                gain = gain + amp(level_db) * ramp(s, s + length, SPELL_EDGE_S, SPELL_EDGE_S)
        out = out + gain * buzz(turns, [(k, 0)], 2.15, 15.5, 0.058)
    return out


def jolts():
    """Impulse response: gains of flex, grind and rattle swell fast and decay exponentially."""
    s, *levels_db = np.transpose(JOLTS)
    out, width = [], int(JOLT_RISE_S * SR)
    for level_db, t60 in zip(levels_db, JOLT_T60_S):
        kicks = np.full(N, 1e-18)
        kicks[np.clip(s * SR - width / 2, 0, N - 1).astype(int)] = amp(level_db)
        dying = signal.lfilter([1], [1, -amp(-60 / (t60 * SR))], kicks)
        out.append(uniform_filter1d(dying, size=width))   # averaging rounds the onset
    return out


def pops():
    """Decaying frequency glide: a sine falls exponentially in pitch while it dies."""
    out, t = np.zeros(N), np.arange(int(.06 * SR)) / SR
    for s, level_db, start_hz, end_hz in POPS:
        hz = end_hz + (start_hz - end_hz) * np.exp(-t / 0.0024)
        decay = 0.5 * np.exp(-t / 0.0045) + 0.17 * np.exp(-t / 0.01)
        shape = (1 - np.exp(-t / 0.0016)) * decay
        at = round(s * SR)
        out[at:at + len(t)] += amp(level_db + 5.5) * shape * np.sin(2 * np.pi * np.cumsum(hz) / SR)
    return out


def room():
    """Stationary background: low-pitched noise of constant strength."""
    return amp(ROOM_RUMBLE_DB) * colour(1, ROOM_RUMBLE)


def scene():
    """Superposition: all sources add, and one microphone feeds both channels."""
    turns = np.cumsum(in_time(SWING)[0]) / SR
    rasp_gain, clang_gain = contact()
    touching = np.clip(rasp_gain / amp(-31), 0, 1)   # 0 in the air, 1 while the teeth rasp
    saw = cut(turns, rasp_gain, clang_gain) + tool(turns, touching)
    mono = saw + work(turns, touching) + pops() + room()
    return np.tile(mono, (2, 1))


def record(dry):
    """Saturation and band limits: peaks are rounded, the deepest bass and the top are cut."""
    rounded = .34 * np.tanh(dry / .34)
    lean = signal.sosfilt(signal.butter(2, 45, "high", fs=SR, output="sos"), rounded)
    return signal.sosfilt(signal.ellip(16, .5, 80, CUTOFF_HZ, fs=SR, output="sos"), lean)


dry = scene()
out = record(dry)
unload_wav(out)
```